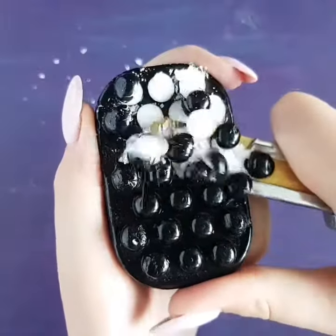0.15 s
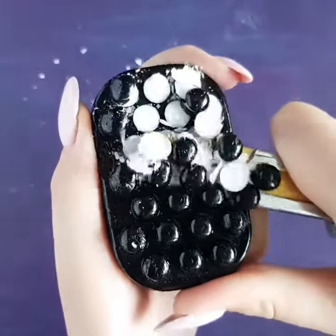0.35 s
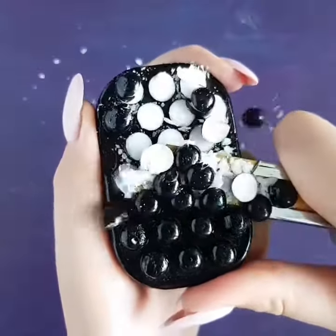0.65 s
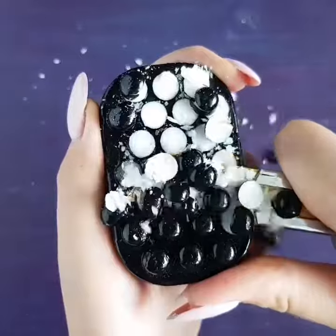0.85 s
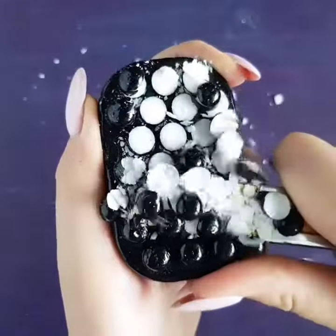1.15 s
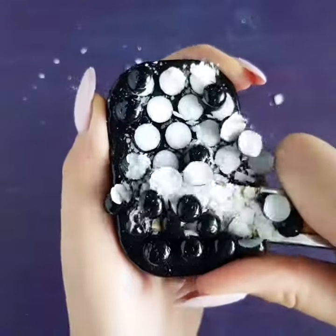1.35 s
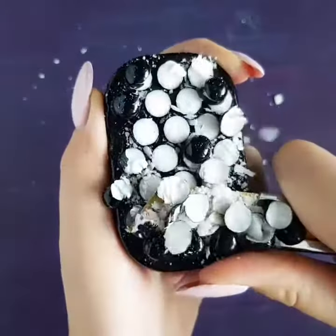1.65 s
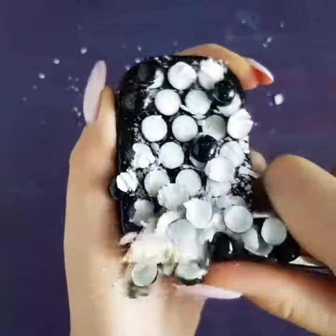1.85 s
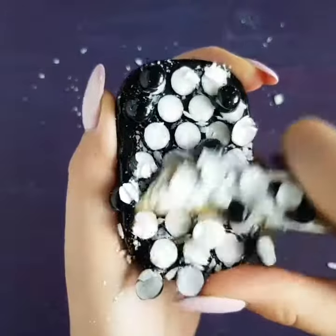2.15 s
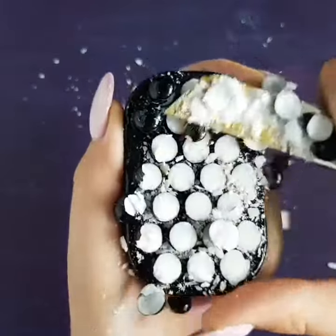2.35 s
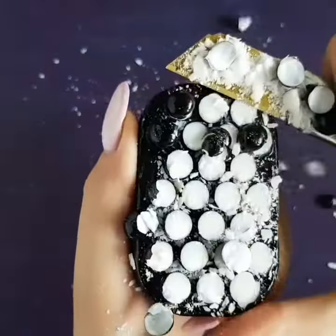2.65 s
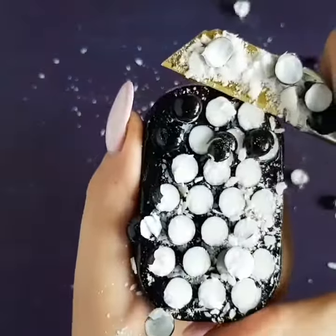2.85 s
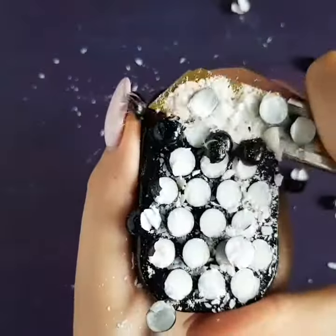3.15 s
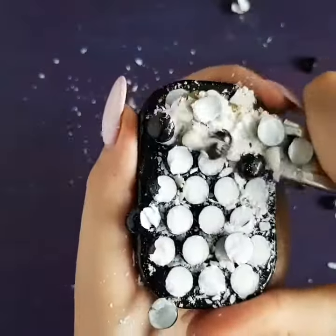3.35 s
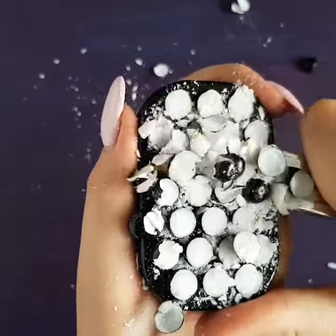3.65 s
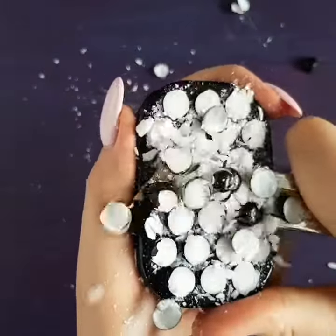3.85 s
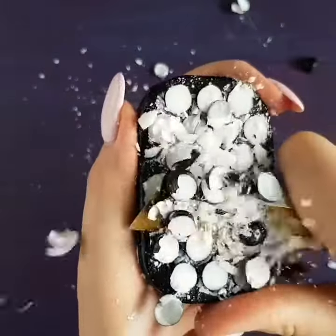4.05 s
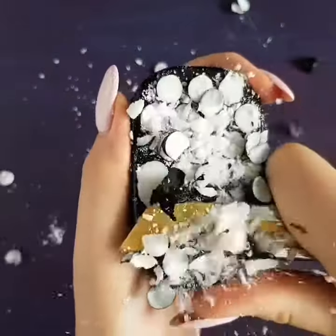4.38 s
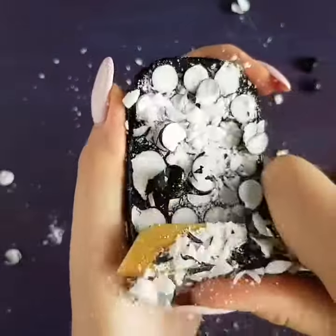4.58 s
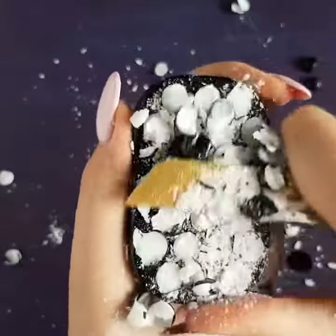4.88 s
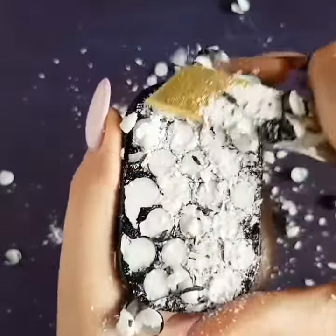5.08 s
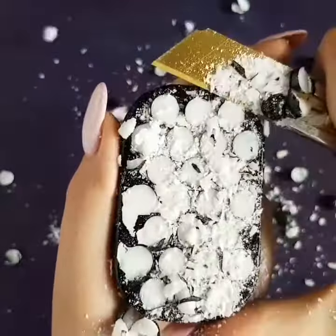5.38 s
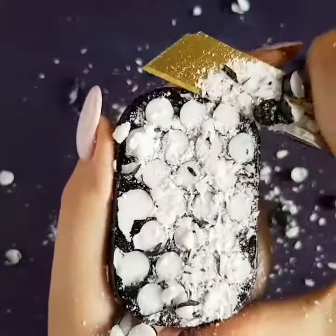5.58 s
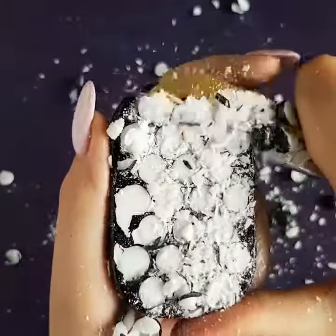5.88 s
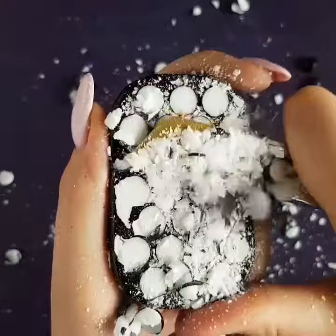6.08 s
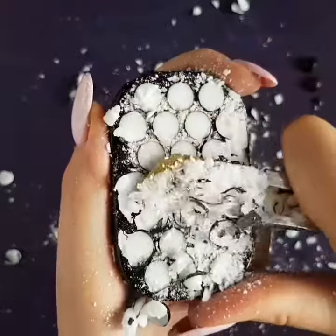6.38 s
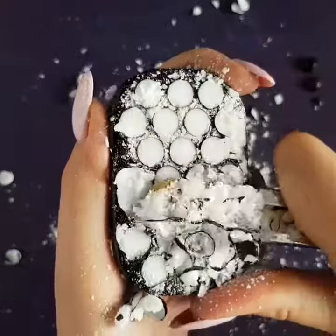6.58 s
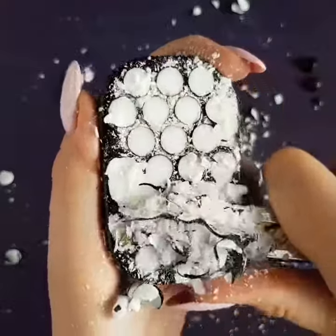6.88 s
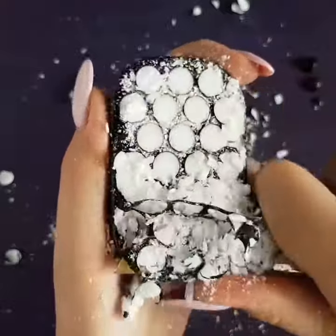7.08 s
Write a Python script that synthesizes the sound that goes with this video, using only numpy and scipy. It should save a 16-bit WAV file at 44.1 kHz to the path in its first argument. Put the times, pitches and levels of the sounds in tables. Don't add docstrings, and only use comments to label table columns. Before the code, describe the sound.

Very close stereo sound of a blade cutting brittle studs off a dry soap bar in a small room. From 0 to 1.7 s, crisp high snaps come in irregular clusters, strong near 0.4, 0.56 and 1.1 s, with short crunches and dull low hand thumps. Around 1.7 to 2.1 s pieces knock on the hollow table. At 2.4 to 2.9 s a dense clatter of falling bits peaks with a very sharp crack near 2.5 s, over a swell of powdery crumbling and rattle. It thins out, then hard knocks hit at 3.4 s. From 3.6 to 4.6 s there are crunchy scrapes, a bright snap near 4 s and heavy low bumps. Sharp breaks and knocks return around 5.1 to 5.5 s. From 5.9 s come gritty scraping and thumps, a loud crack at 6.4 s, then sparser ticks and soft crunches to about 7.1 s.

```python
import sys
import numpy as np
from scipy import signal
from scipy.fft import rfft, irfft
from scipy.io import wavfile
from scipy.ndimage import uniform_filter1d

SR = 44100
rng = np.random.default_rng(int(sys.argv[2]) if len(sys.argv) > 2 else 0)


def invert_db(level):
    return 10 ** (np.asarray(level, dtype=float) / 20)


def dump(signal):
    limited = np.clip(np.atleast_2d(signal).T, -1, 1)
    pcm = np.round(limited * 32767).astype(np.int16)
    wavfile.write(sys.argv[1], SR, pcm)


N = 318843

# start in seconds, snap in dB, crunch of the bar in dB, length in ms, ring in Hz.
FIRST_FLAKES = [(0.0305, -21.5, -31.5, 2.3, 7100), (0.1117, -17, -47, 1.7, 6700),
                (0.1175, -20, -33, 1.4, 7650), (0.16, -14, -28, 1.6, 6700),
                (0.1664, -17.5, -28.5, 4.3, 6740), (0.1766, -15, -43, 1.8, 6500),
                (0.2196, -26, -54, 1.5, 7490), (0.2499, -16, -28, 2.7, 6860),
                (0.3895, -7, -9.5, 1.72, 6100), (0.4232, -18.5, -55, 2.2, 8700),
                (0.5292, -16.5, -37, 1.67, 6950), (0.559, -7, -22, 1.94, 6840),
                (0.7135, -40, -65.5, 2, 5860), (0.7284, -17, -31, 1.6, 6250), (0.7338, -29, -44, 2.3, 6200),
                (0.7466, -20.5, -62, 1.2, 6200), (0.8573, -12.5, -26.5, 2.7, 6100),
                (0.8699, -15.5, -29, 1.8, 7460), (0.8805, -24, -31, 2.4, 7150),
                (1.0369, -27.5, -53, 1.8, 5600), (1.0587, -15, -22.5, 2.2, 7260),
                (1.0878, -23, -55, 1.2, 6340), (1.1103, -9, -48, 1.5, 6650),
                (1.1747, -22.5, -60, 2.8, 5900), (1.2248, -17.5, -24, 2.2, 6460),
                (1.2384, -28, -25, 1.5, 4500), (1.386, -15, -29.5, 2.03, 6300),
                (1.415, -31, -61, 1.3, 6630), (1.4324, -13.5, -36.5, 1.25, 6170),
                (1.4451, -12.5, -16, 1.9, 6660), (1.598, -18.5, -28.5, 2.8, 7260),
                (1.5958, -14.5, -31, 1.9, 6900), (1.6267, -31.5, -63.5, 2.4, 6370)]
LATER_FLAKES = [(1.8382, -18, -48, 1.3, 6460), (1.8664, -13, -21, 3.2, 6600), (2.14, -57, -33.5, 2.3, 4570),
                (2.151, -42, -25, 1.5, 4910), (2.161, -46, -33, 1.6, 4820), (2.252, -49, -46, 5.1, 6270),
                (2.291, -34, -51, 2.7, 4570), (2.4084, -25, -31.5, 1.5, 8200),
                (3.2164, -25.5, -51, 2.6, 7320), (3.2445, -27.5, -53, 1.7, 6300),
                (3.3468, -28, -39, 2.4, 7410), (3.6579, -20, -52, 1.45, 6630),
                (3.7285, -21.5, -58, 0.92, 6600), (3.7538, -23.5, -38, 1.7, 6370),
                (3.759, -18.5, -30, 1.36, 6600), (3.9686, -8, -19.5, 1.24, 6350),
                (4.0759, -22.5, -27.5, 2.5, 5750), (4.268, -25, -30.5, 1.6, 6500),
                (4.585, -15, -25, 1.85, 6000), (4.7901, -29.5, -34.5, 3.3, 5700),
                (4.8594, -27.5, -27, 2.1, 7410), (4.8741, -21.5, -22.5, 1.9, 6230),
                (4.9783, -42, -23.5, 3.6, 4910), (4.9886, -34, -27.5, 3.9, 4910),
                (5.3371, -9, -21, 1.9, 7600), (5.9365, -21, -38, 2.2, 5560), (5.9458, -22, -31, 1.3, 5510),
                (5.9711, -17, -21.5, 2.4, 6240), (6.15, -33, -61, 2.6, 6290), (6.409, -24, -22, 2.6, 6600),
                (6.503, -19, -22, 3.7, 6030), (6.958, -30, -34, 1.2, 7580), (7.0794, -25, -60, 3.3, 7320)]
HARD_EFFORT_DB = -29.5


def evened(x):
    return x / np.sqrt(np.mean(x ** 2) + 1e-20)


def read(points, hz):
    f, value = np.transpose(points)
    return np.interp(np.log(hz + 1), np.log(f + 1), value)


def colour(x, points):
    log_gain = np.log(invert_db(read(points, abs(np.fft.fftfreq(8192, 1 / SR)))))
    taps = np.fft.ifft(np.exp(np.conj(signal.hilbert(log_gain)))).real[:4096]
    return signal.oaconvolve(x, taps[None] / np.linalg.norm(taps))[:, :N]


def resonate(x, hz, width_hz):
    turn = np.exp(2j * np.pi * np.cumsum(hz * np.ones(N)) / SR)
    r = np.exp(-np.pi * width_hz / SR)
    return (turn * signal.lfilter([np.sqrt(2 - 2 * r * r)], [1, -r], x / turn)).real


def pair(same, shape):
    a, b = rng.standard_normal((*shape, 2)).T
    same = np.clip(same, 0, 1)
    return np.array([a, same * a + np.sqrt(1 - same ** 2) * b])


def lean(left_db):
    return invert_db(np.array([[left_db], [-left_db]]))


def effort_db():
    # time in seconds, effort in dB.
    work = [(0.0, -57), (0.8, -60), (1.65, -64), (1.83, -36.5), (2.1, -48), (2.45, -51), (2.659, -31.5),
            (3.3, -53.5), (3.5, -35), (3.7, -50), (4.11, -61), (4.429, -41), (4.95, -47.5), (5.34, -35),
            (5.74, -48.5), (6.4, -40.5), (6.89, -46.5), (7.2, -64)]
    return np.interp(np.arange(N) / SR, *np.transpose(work))


def hand_rumble(effort):
    # frequency in Hz, level in dB.
    tremor_spectrum = [(15, 5.5), (55, 1.5), (110, 2), (400, -23), (900, -46)]
    level_db = -39 + 0.3 * (effort - HARD_EFFORT_DB)
    return invert_db(level_db) * colour(pair(0.12, (N,)), tremor_spectrum) * lean(2.1)


def jolts():
    # time in seconds, level in dB, lean to the left in dB.
    hand_jolts = [(0.17, -23, 0), (0.255, -23.5, 4), (0.419, -31.5, 1), (0.585, -20, 4), (0.883, -23, -4),
                  (1.0647, -20.5, 6.5), (1.229, -20.5, 13), (1.447, -17, 4), (1.5996, -22, 9),
                  (1.705, -24, 5), (1.892, -25, 15), (2.279, -25, 1), (2.473, -30, 10), (3.193, -23.5, 5),
                  (3.445, -24, 3), (3.598, -20, 7.5), (3.839, -15, 1), (4.043, -14.5, 0),
                  (4.313, -16.5, -4), (4.377, -12, -2), (4.597, -24.5, -5), (5.137, -19, 4),
                  (5.317, -25.5, 3), (5.805, -29.5, 7), (5.99, -17.5, 6.5), (6.087, -21, 9),
                  (6.282, -20.5, 12.5), (6.503, -28, 2.5), (6.745, -17, 8), (7.049, -17.5, 4)]
    # time in seconds, level in dB.
    nudges = [(0.027, -31.5), (0.562, -24), (3.066, -27), (5.243, -26.5), (5.501, -30), (5.702, -28.5),
              (5.75, -28.5), (5.855, -25.5), (5.96, -17), (6.0237, -22.5), (6.203, -29.5), (6.333, -28),
              (6.401, -31), (7.027, -27.5)]
    # frequency in Hz, level in dB.
    rub_spectrum = [(30, 4), (90, 6.5), (250, -6), (600, -12.5), (1200, -32)]
    nudge_lean_db = 4.5
    rock_hz, rock_s, rock_right = 115.7, 0.0044, -0.37
    sway_hz, sway_s, sway_db = 64.3, 0.013, -3
    moves = hand_jolts + [(s, db, nudge_lean_db) for s, db in nudges]
    chance = rng.standard_normal((len(moves), 3))
    out, skin = np.zeros((2, N + 3000)), np.zeros((2, N + 3000))
    t = np.arange(-1500, 1500) / SR
    for (s, db, lean_db), (size, skew, weight) in zip(moves, chance):
        at, side = round(s * SR), lean(lean_db / 2)
        pace, late = invert_db(1.0 * size) * t, np.maximum(t + 0.0019, 0)
        rock = -np.exp(-(pace / rock_s) ** 2) * np.cos(2 * np.pi * rock_hz * pace + 0.66 * skew)
        sway = np.exp(-late / sway_s) * np.sin(2 * np.pi * sway_hz * late)
        sway = invert_db(sway_db + 2 * weight) * sway
        out[:, at:at + 3000] += invert_db(db + 1.5) * (side * rock * np.array([[1], [rock_right]]) + sway)
        skin[:, at:at + 3000] += invert_db(db + 6.0) * side * np.exp(-(t / 0.015) ** 2)
    rub = skin[:, 1500:N + 1500] * pair(0.16, (N,))
    bar_ring = resonate(rub + 0.43 * rub[::-1], 566, 160)
    return out[:, 1500:N + 1500] + invert_db(-14) * colour(rub, rub_spectrum) + invert_db(-29.5) * bar_ring


def grains(per_s, spread_db, same, smooth):
    clumps = evened(uniform_filter1d(rng.standard_normal(N), size=900))
    size = invert_db(spread_db * np.minimum(rng.exponential(1, N), 1.8))
    size = size * (rng.random(N) < per_s / SR)
    size = signal.lfilter([1], [1, -.985], size)
    clump_gain = invert_db(3.4 * np.clip(clumps, -4, 1))
    return evened((evened(size) + smooth) * clump_gain * pair(same, (N,)))


def fine_crumbling(effort):
    # frequency in Hz, level in dB per Hz.
    crumble_spectrum = [(120, -20.5), (200, 1), (400, -1), (2820, -2.5), (3490, -6.5), (6850, -4),
                        (12500, -17), (13900, -31.5)]
    return invert_db(effort - 0.5) * colour(grains(270, 2.5, 0.58, 1.3), crumble_spectrum)


def hollow_table(drive, count=5):
    # frequency in Hz, width in Hz, level in dB.
    modes = [(938, 90, -0.5), (1005, 120, -14), (1309, 79, -7), (1771, 82, -9.5), (2240, 170, -33)]
    spot = 1 + 0.017 * evened(uniform_filter1d(rng.standard_normal(N), size=3000))
    out = 0
    for k, (hz, width_hz, db) in enumerate(modes[:count]):
        out = out + (-1) ** (k // 2) * invert_db(db) * resonate(drive, hz * spot, width_hz)
    return out


def crumb_rattle(effort):
    level_db = -49 + 3.5 * (effort - HARD_EFFORT_DB)
    return invert_db(level_db) * evened(hollow_table(grains(150, 2.2, 0.7, 0.5), count=3))


def room(x):
    # frequency in Hz, t60 in seconds.
    decay = [(500, 0.28), (1500, 0.28), (5000, 0.22), (12000, 0.26)]
    # frequency in Hz, left-right likeness (0 to 1).
    likeness = [(500, 0.69), (1500, 0.68), (5000, 0.52), (12000, .3)]
    out, turn = 0, np.arange(N) / SR * 9.1
    for k in range(3):
        taps = np.zeros((2, SR // 2))
        at = np.arange(260, SR // 2 - 20, 20) + rng.integers(0, 20, (2, (SR // 2 - 261) // 20))
        np.put_along_axis(taps, at, rng.choice([-1., 1.], at.shape), 1)
        hz, t, z = signal.stft(taps, SR, nperseg=256)
        same = np.clip(read(likeness, hz), 0, 1)[:, None]
        z[1] = same * z[0] + np.sqrt(1 - same ** 2) * z[1]
        tail = signal.istft(z * invert_db(-60 * t / read(decay, hz)[:, None]), SR, nperseg=256)[1]
        feed = x.mean(0) * np.cos(turn + k * np.pi / 3)
        out = out + signal.oaconvolve(feed[None], tail / np.linalg.norm(tail[0]), axes=1)[:, :N]
    return out


def patchy(x, patch_db):
    z = signal.stft(x, nperseg=256, noverlap=128)[2]
    patches = uniform_filter1d(rng.standard_normal(z.shape[1:]), size=3, axis=0)
    patches = uniform_filter1d(patches, size=5, axis=1)
    return signal.istft(z * invert_db(patch_db * evened(patches)), nperseg=256, noverlap=128)[1][:, :N]


def flake_breaks():
    # time in seconds, snap in dB.
    ticks = [(0.2028, -41), (0.23, -44), (0.308, -43), (0.318, -54), (0.68, -39), (0.7792, -62),
             (0.828, -39), (0.89, -29), (0.9858, -43), (1.29, -45), (1.333, -50), (1.353, -48),
             (1.5202, -73), (2.3948, -34.5), (3.316, -47), (3.71, -43.5), (3.802, -46), (3.955, -37.5),
             (4.531, -44), (4.776, -43), (4.815, -36), (4.831, -41), (4.905, -35.5), (4.955, -36.5),
             (5.0724, -51), (5.678, -37), (5.7453, -37), (5.79, -41), (5.802, -35.5), (5.835, -59.5),
             (5.852, -34), (5.928, -37), (6.131, -37), (6.8845, -49), (7.1232, -43), (0.1858, -32),
             (0.5405, -50), (1.92, -28), (2.058, -45), (2.0703, -46.5), (2.0864, -59), (2.9683, -40),
             (3.063, -46), (3.284, -43), (3.5073, -29), (3.887, -47), (4.142, -35), (5.1118, -28.5),
             (5.194, -27), (5.5474, -36), (5.5716, -37), (5.721, -42), (5.959, -27), (6.1117, -42),
             (6.3615, -52), (6.7019, -44), (6.7433, -22), (6.8552, -48.5), (6.9306, -47)]
    # time in seconds, crunch in dB.
    crumbs = [(0.44, -40), (0.4481, -37), (0.5855, -32), (0.9312, -42.5), (0.944, -40), (0.9675, -41),
              (1.1988, -27), (1.8956, -18.5), (2.0743, -40), (2.0845, -33), (2.1712, -29), (2.2276, -30),
              (2.6775, -22.5), (2.7836, -26.5), (3.012, -39), (3.0454, -39.5), (3.4892, -27), (3.5647, -38),
              (3.654, -47), (3.6953, -61), (4.1595, -32.5), (4.413, -27), (4.5314, -38.5), (4.7725, -45),
              (4.91, -34.5), (5.0753, -40), (5.151, -26), (5.551, -35), (5.7132, -43), (5.9517, -30),
              (6.016, -45), (6.0853, -29.5), (6.4629, -26), (6.637, -30), (6.7557, -37), (6.837, -44),
              (6.968, -48), (7.0378, -22.5), (7.0583, -28), (7.0738, -44)]
    tick_ms, tick_crunch_db = 2.6, -3
    crumb_ms, crumb_snap_db = 2.9, -15.5
    small = [(s, db, db + tick_crunch_db, tick_ms, 0) for s, db in ticks]
    small += [(s, db + crumb_snap_db, db, crumb_ms, 0) for s, db in crumbs]
    s, snap_db, crunch_db, length_ms, _ = np.transpose(FIRST_FLAKES + LATER_FLAKES + small)
    fade_ms = 0.91 * length_ms + 1.1 * np.minimum(invert_db(crunch_db - snap_db), 1)
    return [s, snap_db, crunch_db - 40, crunch_db, 1.07 * length_ms, fade_ms]


def stud_landings():
    # time in
    # seconds, knock in dB, snap in dB, fade in ms.
    first_drops = [(0.8364, -10, -18.5, 4.7), (0.8885, -28.5, -44, 17.3), (1.139, -5.5, -13.5, 5.6),
                   (1.6742, -0.5, -20, 1.55), (1.7, -1.5, -8.5, 6.7), (1.8183, -16.5, -21, 9.8),
                   (1.8847, -20, -11, 3.3), (1.9727, -12.5, -9.5, 2.4), (1.983, -49.5, -19.5, 4.9),
                   (2.032, -32.5, -41.5, 23), (2.13, -26, -50.5, 1.7), (2.47, -5, -21.5, 12),
                   (2.477, -7, -6, 3.8), (2.486, -6, 5.5, 0.6), (2.575, -11.5, -40, 5),
                   (2.592, -7.5, -27, 7.9), (2.6213, -3, -16, 8.8), (2.626, -7, -11.5, 9.3),
                   (2.648, -17, -14.5, 13.4), (2.696, -16.5, -30, 2.3), (2.7109, -13.5, -26, 6.6),
                   (2.7239, -6.5, -10.5, 3), (2.737, -31.5, -32, 5.3), (2.778, -27, -44, 1.7),
                   (2.7935, -14.5, -13.5, 6.7), (2.867, -22, -52, 2.5), (2.8817, -23, -15.5, 5.8),
                   (2.902, -33, -42, 1.3), (2.9138, -21, -14.5, 0.96), (2.978, -31, -34, 7.5),
                   (3.072, -28.5, -32, 7.4), (3.4021, 1.5, -11, 2.57), (3.4405, -4, 1.5, 0.95),
                   (3.5216, -28, -19, 2.1), (3.535, -29, -69, 51), (3.608, -31.5, -59, 27)]
    later_drops = [(4.123, -21, -21.5, 3.4), (4.2886, -19, -29, 39), (4.312, -1, -9, 5.4),
                   (4.323, -9.5, -21, 4.6), (4.333, -22.5, -19, 53), (4.344, -22, -13, 1.8),
                   (4.439, -6.5, -19, 3.6), (4.487, -23, -37, 5.4), (4.4937, -25, -40, 12),
                   (4.5478, -29, -25.5, 0.96), (4.6347, -18, -15, 3.7), (4.6477, -31, -53, 7.5),
                   (4.721, -27, -49, 3.4), (5.1023, -5.5, -19.5, 3.1), (5.185, -7, -27, 6.1),
                   (5.197, -14.5, -22, 7.5), (5.253, -17.5, -50, 3.5), (5.2856, -19, -35, 13.4),
                   (5.3182, -0.5, -3.5, 2.26), (5.337, -18.5, -32, 4.1), (5.428, -15, -32, 3.3),
                   (5.452, -25, -41, 5.5), (5.4776, -10, -39, 3.7), (5.487, -11.5, -21.5, 3),
                   (5.603, -30.5, -28, 2.6), (5.637, -28, -30.5, 3.6), (6.1576, -33, -29.5, 5.3),
                   (6.2958, -16, -45, 1.8), (6.399, -5, 0, 2.5), (6.47, -12.5, -28, 5.5),
                   (6.484, -25, -29, 10), (6.512, -16, -14.5, 6.2), (6.6236, -25, -50, 5.2),
                   (6.714, -28.5, -32, 5.5), (6.789, -26.5, -48, 2.7), (6.846, -24.5, -29, 3)]
    s, knock_db, snap_db, fade_ms = np.transpose(first_drops + later_drops)
    crunch_db = 20 * np.log10(np.hypot(invert_db(knock_db - 5.5), invert_db(snap_db - 2)))
    return [s, snap_db, knock_db, crunch_db, 1.535 + 0.08 * fade_ms, fade_ms]


def scrapes():
    # time of the peak in seconds, snap in dB, crunch in dB, length in ms.
    ploughings = [(0.035, -33, -56, 8.6), (0.125, -22.5, -34, 6), (0.577, -46, -36.5, 8),
                  (1.1942, -30.5, -32, 24), (2.174, -38.5, -31.5, 40), (2.2515, -35, -30, 37),
                  (2.691, -42, -26, 15), (3.199, -34, -32.5, 15), (3.592, -20.5, -21, 5.7),
                  (3.818, -28, -31, 3.3), (3.8357, -18, -24.5, 8.1), (4.044, -15.5, -19, 7.6),
                  (4.34, -54, -40, 7), (4.377, -16, -20.5, 14.6), (4.558, -24, -51, 2.2),
                  (4.608, -31.5, -37, 16), (5.1414, -32.5, -28, 25), (5.301, -24, -42, 4.8),
                  (5.459, -31.5, -31.5, 43), (5.85, -33, -45, 2.7), (5.979, -23, -21.5, 5.9),
                  (6.0218, -28.5, -30.5, 8.3), (6.077, -29, -38, 11), (6.268, -29.5, -30.5, 26),
                  (6.332, -33, -45, 3.6), (6.738, -25.5, -32, 17), (4.305, -23, -24, 9.7),
                  (1.065, -21, -22.5, 3), (1.074, -45, -54, 2.5), (3.376, -38.5, -47.5, 13),
                  (7.021, -29.5, -46, 8.7), (7.048, -17.5, -23, 9.3)]
    s, snap_db, crunch_db, length_ms = np.transpose(ploughings)
    return [s, snap_db, crunch_db - 42, crunch_db, length_ms, 0.84 * length_ms]


def fractures():
    return np.hstack([flake_breaks(), stud_landings(), scrapes()])


def levelled(sound, energy, share):
    z = rfft(sound, axis=1)
    power = uniform_filter1d((abs(z) ** 2).mean(0), size=21, axis=0)
    mean_power = power.mean(0)
    log_gain = np.log(energy / mean_power) / 2 - np.clip(share, 0, 1) / 2 * np.log(power / mean_power)
    fold = irfft(log_gain, axis=0)[:len(power)]
    fold[1:] *= 2
    return irfft(z * np.exp(rfft(fold, sound.shape[1], axis=0)), axis=1)


def volleys(db, same, stretch, lumpy_db, even):
    s, swell_ms, fade_ms = fractures()[[0, -2, -1]]
    t_ms = np.arange(-1200, 2800)[:, None] / SR * 1000
    swell = np.clip(swell_ms - .8, .3, 15)
    fade = stretch * np.clip(fade_ms - .8, .3, 25)
    rise = (abs(t_ms) / swell) ** (1 + np.minimum(0.25 / swell, 2))
    shape = np.exp(-.8 * np.where(t_ms < 0, rise, abs(t_ms) / fade))
    shape += 0.82 * np.exp(-abs(t_ms) / 0.11) * (fade_ms < 4)
    shape += 0.0042 * np.exp(-abs(t_ms) / 1.9)
    lumps = uniform_filter1d(rng.standard_normal((len(s), 4000)), size=30).T
    lumps = invert_db(lumpy_db * np.clip(evened(lumps), -3, 1.6))
    sound = pair(same, (len(s), 4000)) * lumps * shape
    sound = invert_db(db) * levelled(sound, (shape ** 2).sum(0), even)
    out = np.zeros((2, N + 4000))
    for k, at in enumerate(np.round(s * SR).astype(int)):
        out[:, at:at + 4000] += sound[:, :, k]
    return out[:, 1200:N + 1200]


def table_knocks():
    # frequency in Hz, level in dB.
    thud_spectrum = [(60, -15), (150, 14.5), (350, 14), (700, 0.5), (1500, -31)]
    blows = volleys(fractures()[2] - 4, 0.93, 0.51, 2.0, 0.98)
    thud = colour(blows, thud_spectrum) * np.array([[1], [-0.91]])
    return hollow_table(blows) + invert_db(-20.5) * thud


def bar_crunches():
    # frequency in Hz, level in dB.
    crunch_spectrum = [(250, -9.5), (750, -14.5), (1300, -6.5), (2300, -3.5), (3500, -6), (5000, -7.5),
                       (8000, -27)]
    return colour(volleys(fractures()[3] - .6, 0.81, 1.0, 5.1, 0.2), crunch_spectrum)


def flake_hz():
    s, *_, hz = np.transpose(FIRST_FLAKES + LATER_FLAKES)
    t = np.arange(N) / SR
    nearest = np.clip(np.searchsorted((s[1:] + s[:-1]) / 2, t), 0, len(s) - 1)
    drift = evened(uniform_filter1d(rng.standard_normal(N), size=1500))
    common_hz = 6630 * (1 + 0.17 * drift)
    return np.where(abs(t - s[nearest]) < .012, hz[nearest], common_hz)


def flake_snaps():
    # frequency in Hz, level in dB.
    snap_spectrum = [(2500, -36.5), (4200, -4), (6500, 4), (9000, -1), (12800, -4.5), (14000, -28.5)]
    snap = colour(volleys(fractures()[1] - .6, 0.036, 0.84, 2.04, 0.78), snap_spectrum)
    ring = resonate(snap, flake_hz(), 1300)
    return (0.76 * snap + 0.36 * ring) * lean(.6)


def scene():
    effort = effort_db()
    handling = hand_rumble(effort) + jolts()
    crumbs = fine_crumbling(effort) + crumb_rattle(effort)
    knock, crunch, snap = table_knocks(), bar_crunches(), flake_snaps()
    wet = room(invert_db(-13.5) * snap + invert_db(-12.5) * knock + invert_db(-12.0) * crunch)
    return patchy(snap + crunch + wet + crumbs + knock, 3.05) + handling


def top_cut(x):
    return signal.sosfilt(signal.butter(12, 14080, fs=SR, output="sos"), x)


def record(dry):
    dry = signal.lfilter(*signal.butter(1, 14, "high", fs=SR), dry)
    clipped = np.clip(dry, -.84, .84)
    limited = signal.oaconvolve(clipped, signal.firwin(301, 13500, fs=SR)[None], "same")
    return top_cut(limited)


dry = scene()
out = record(dry)
dump(out)
```